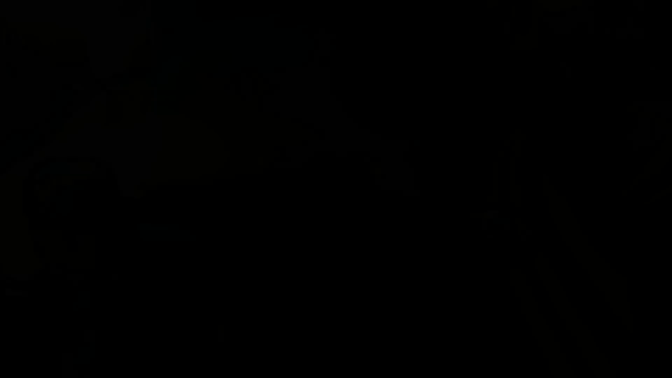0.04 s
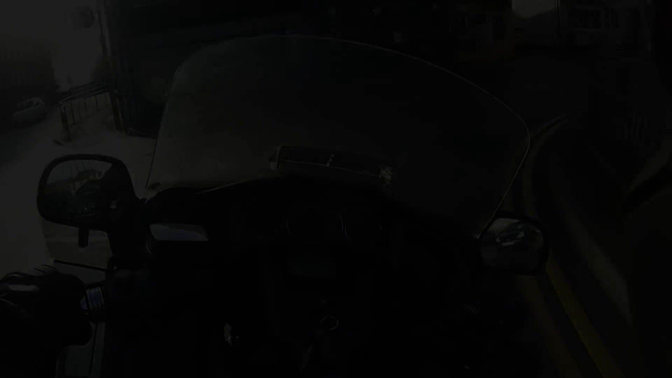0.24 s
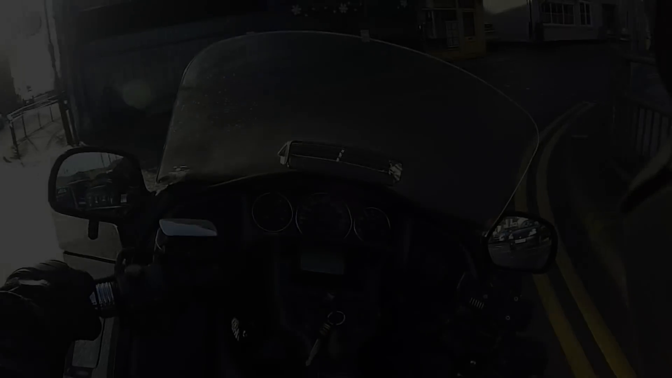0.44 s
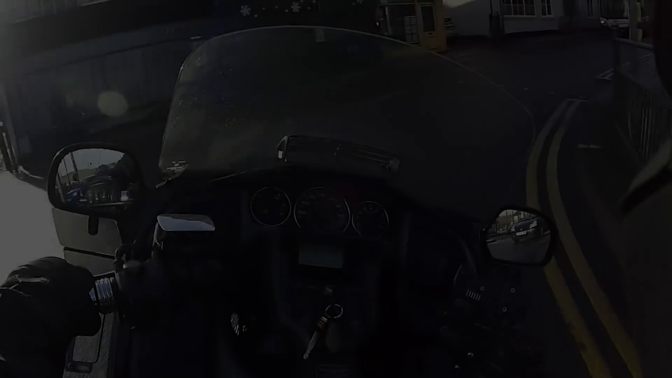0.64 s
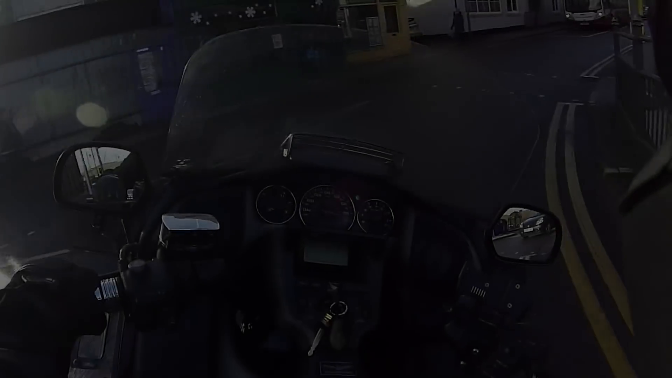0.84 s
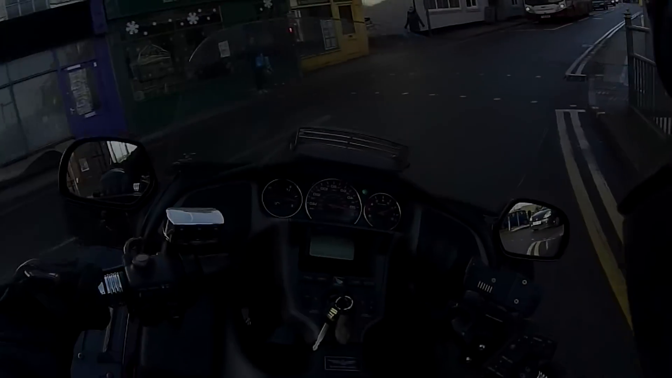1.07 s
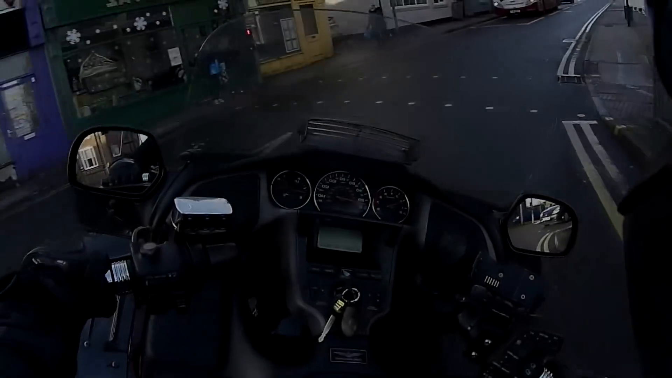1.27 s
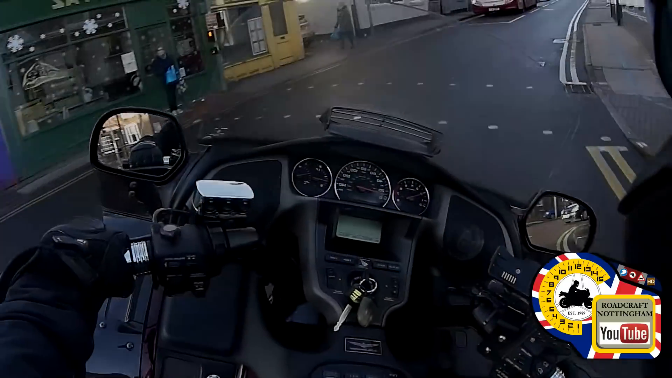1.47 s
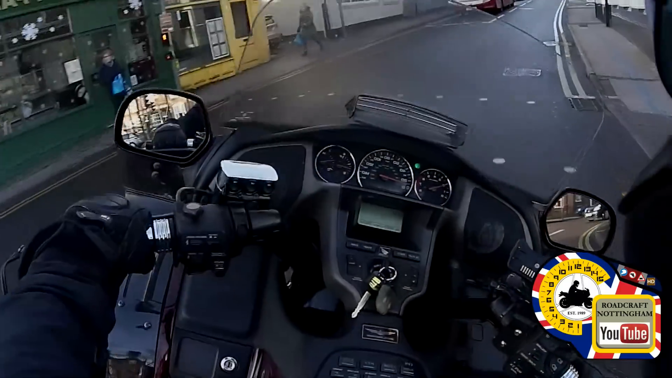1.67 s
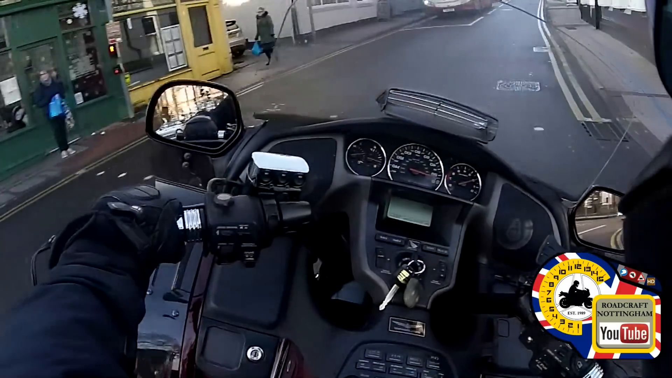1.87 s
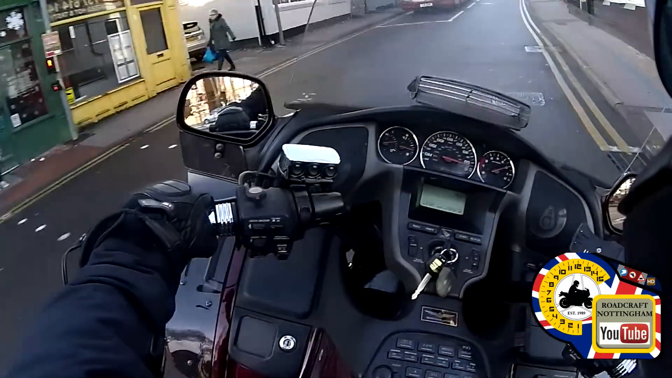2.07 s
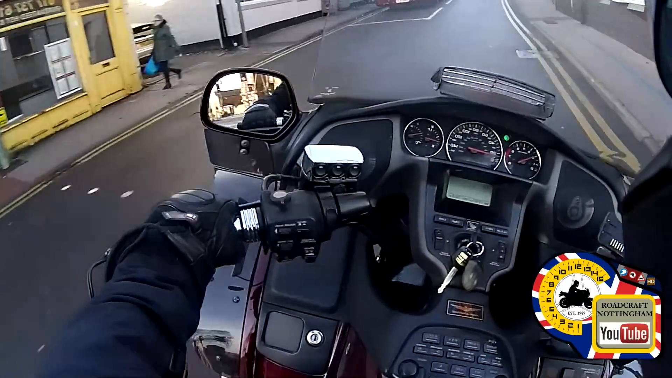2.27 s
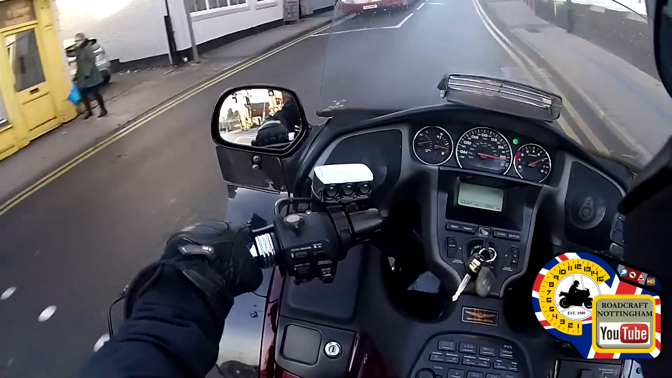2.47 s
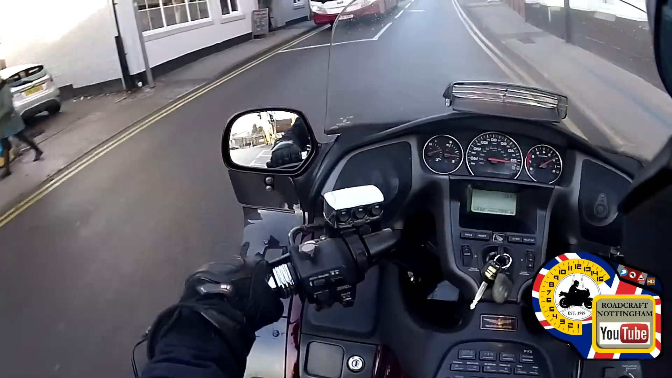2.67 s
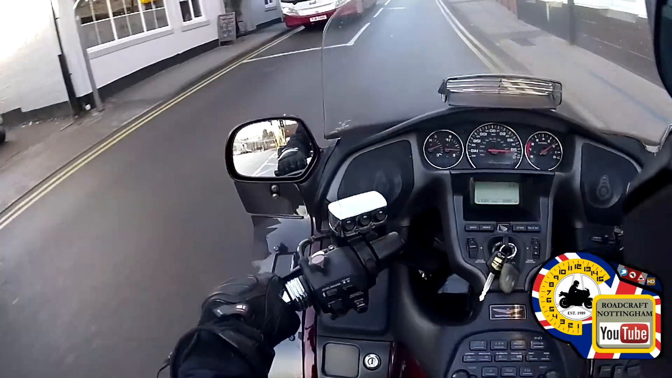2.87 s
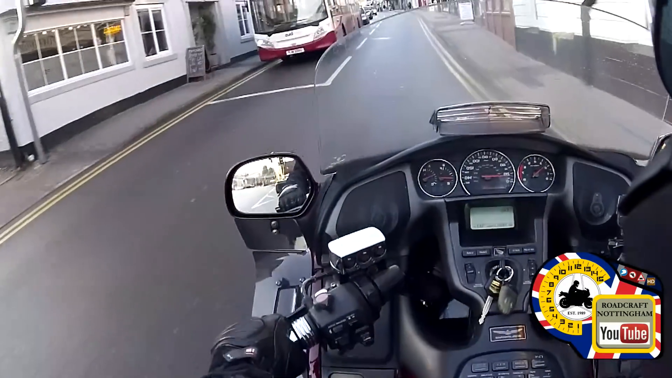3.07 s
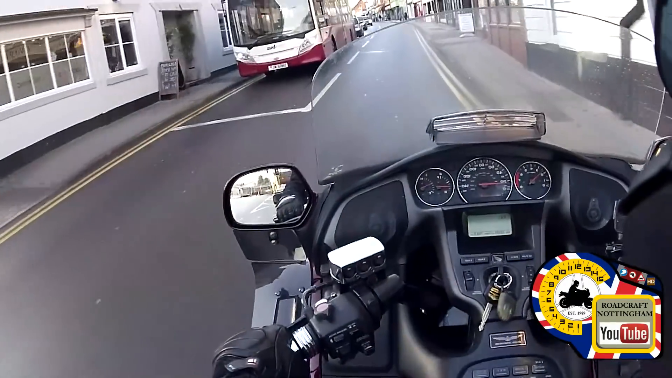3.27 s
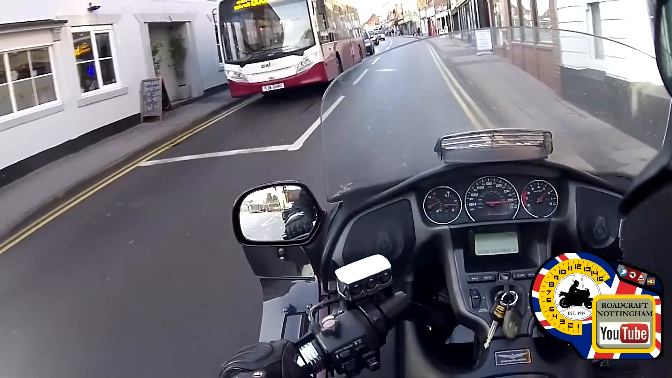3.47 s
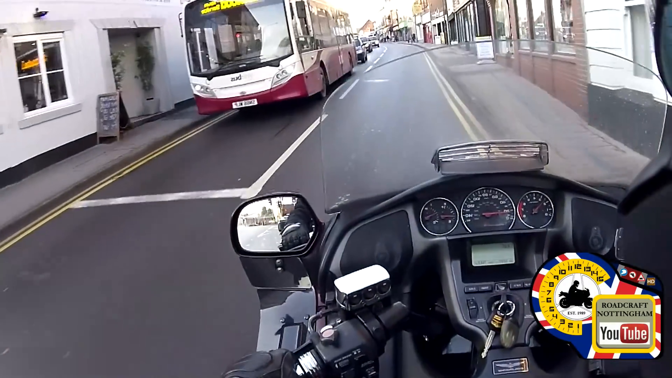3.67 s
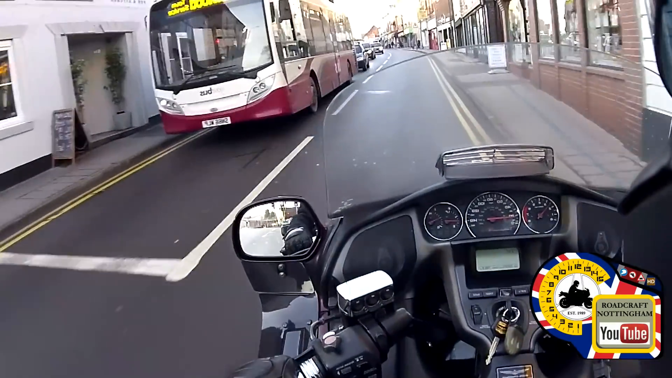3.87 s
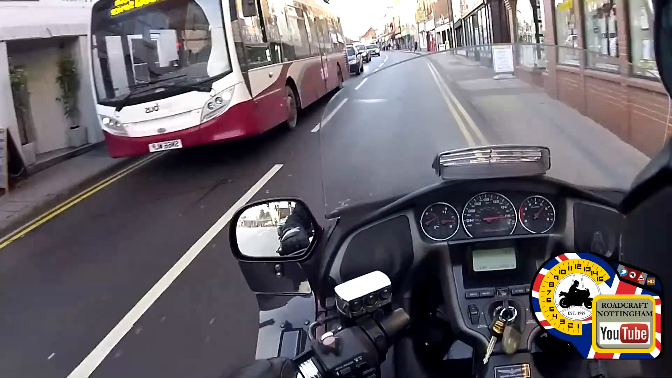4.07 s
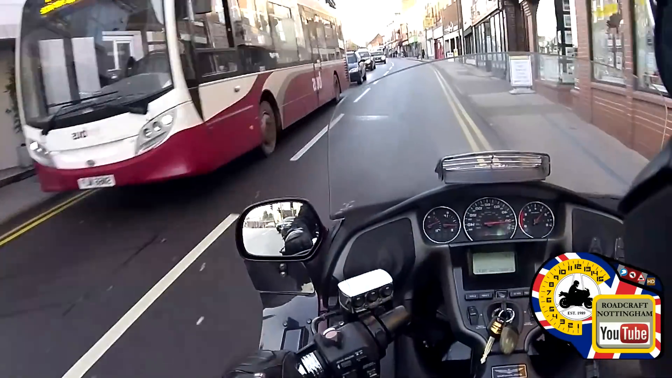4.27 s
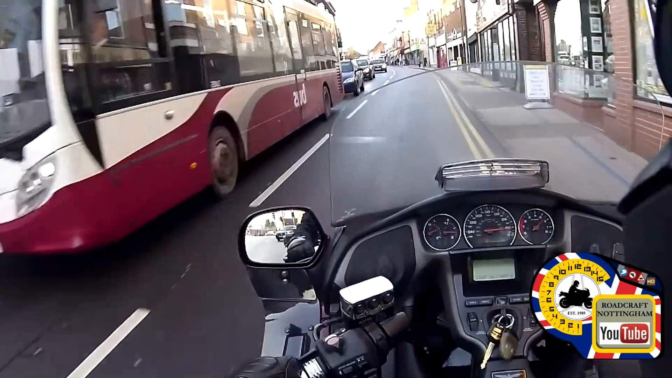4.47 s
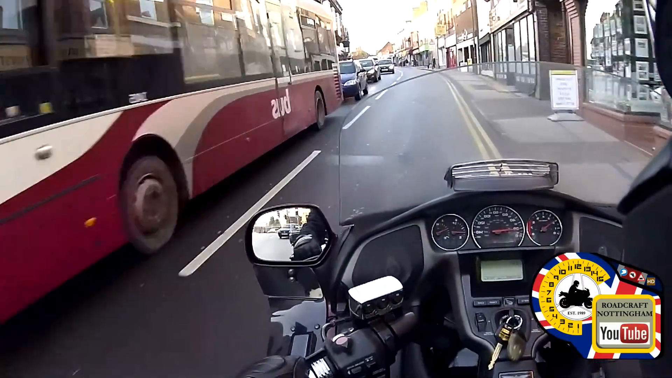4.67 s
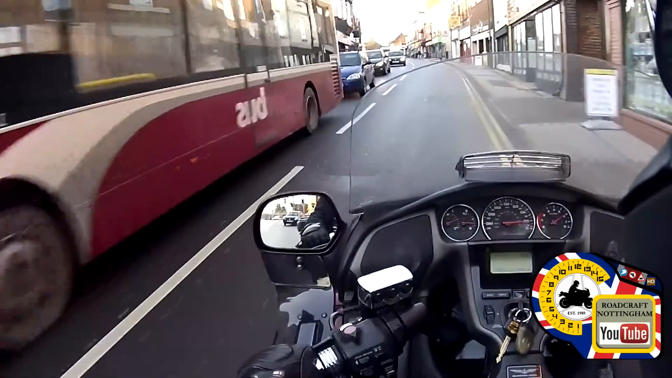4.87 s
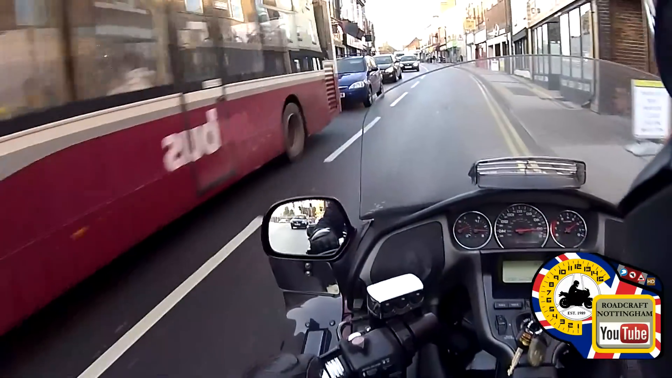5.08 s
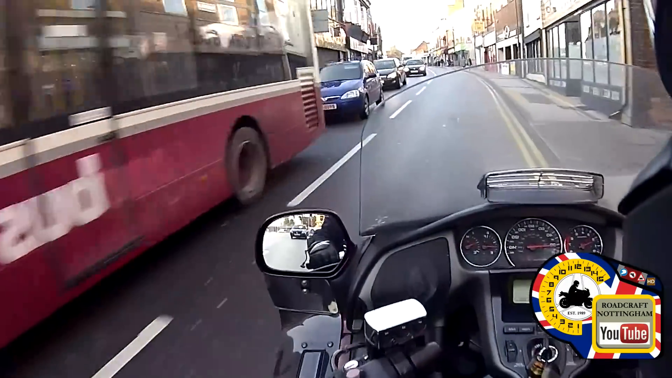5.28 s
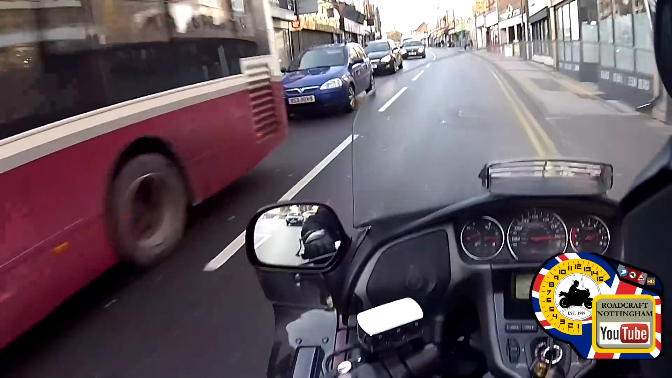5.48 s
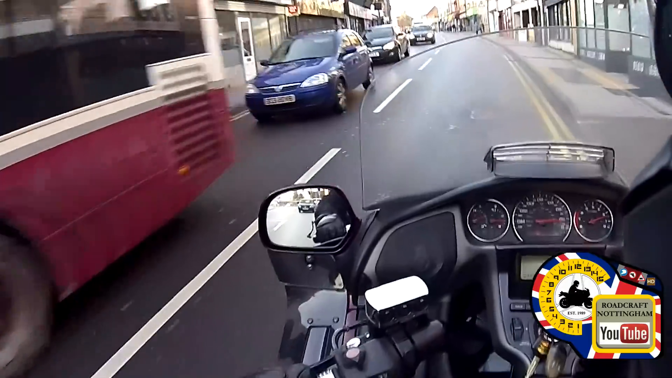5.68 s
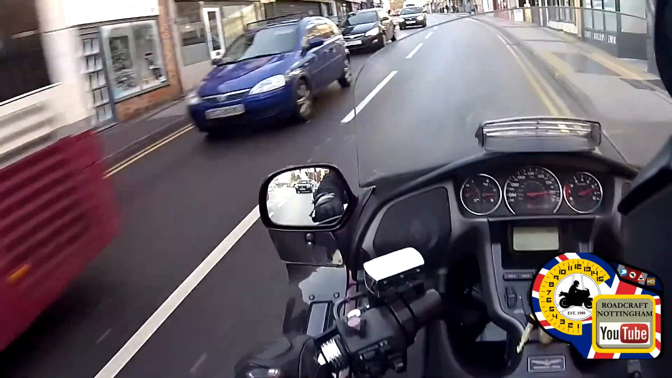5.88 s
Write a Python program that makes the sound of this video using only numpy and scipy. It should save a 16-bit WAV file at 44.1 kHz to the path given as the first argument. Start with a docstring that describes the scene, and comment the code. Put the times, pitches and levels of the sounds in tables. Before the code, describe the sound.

Heard from the seat, a big motorcycle engine climbs in pitch, shifts gear with a clunk and settles to a lower, steady note.

```python
"""A town street, from the seat of a large six-cylinder motorcycle pulling away in first gear.
The firing note climbs, the clutch goes in, a gear clunks home and the engine settles lower in second.
Gear teeth whine above the exhaust, gas pulses ring the fairing and the engine cases rustle.
Tyres and air hiss, wind buffets, loose parts tick; near the end a bus alongside reflects the hiss."""
import sys
import numpy as np
from scipy import signal
from scipy.io import wavfile

SR = 44100
rng = np.random.default_rng(int(sys.argv[2]) if len(sys.argv) > 2 else 0)


def transcribe(signal):
    """Save signal, clipped to [-1, 1], as a 16-bit WAV file at the path in sys.argv[1]."""
    frames = np.atleast_2d(signal).T
    limited = np.clip(frames, -1, 1)
    pcm = np.round(limited * 32767).astype(np.int16)
    wavfile.write(sys.argv[1], SR, pcm)


N = 261424

# Engine speed. Each row: time in seconds, firing rate in Hz.
FIRING_HZ = [(0.3, 89.54), (0.6, 90.17), (0.83, 90.4), (0.98, 91.93), (1.38, 96.1), (1.5, 95.9),
             (1.62, 98.68), (2.14, 105.3), (2.44, 110), (3.24, 121.7), (3.8, 130.6), (4.03, 133),
             (4.08, 129.5), (4.31, 100.1), (4.75, 100.7), (4.95, 79), (5.93, 79.53)]
# Each row: time in seconds, opening from 0 to 1.
THROTTLE_OPENING = [(0, 0.14), (2.3, 1.0), (4.0, 0.94), (4.25, 0.13), (4.78, 0.05), (5.05, 0.66),
                    (5.55, 0.93), (5.78, 0.14), (5.93, 0.49)]
# Firing note. Each row: time in seconds, level in dB.
FIRING_DB = [(0.4, -21.5), (1.5, -21), (2.2, -15), (2.44, -16), (2.67, -11.5), (2.96, -15.5), (3.1, -11.5),
             (3.24, -15), (3.38, -12), (3.49, -14.5), (3.57, -12), (3.68, -13.5), (3.8, -11), (4.03, -14.5),
             (4.08, -20), (4.16, -13.5), (4.37, -31), (4.75, -25.5), (4.95, -28.5), (5.06, -18.5),
             (5.4, -31.5), (5.76, -21), (5.93, -23.5)]
# Its octave at full throttle. Each row: pitch in Hz, level in dB.
OCTAVE_DB = [(158, -16), (180, -17), (195, -26.5), (214, -32.5), (240, -35), (266, -33)]
# Lines from unequal cylinders. Each row: multiple of crank speed, base level in dB.
UNEVEN_LINES = [(2, -45), (4, -30), (4.5, -32.5), (5, -37.5), (7, -43.5), (7.5, -42), (8.5, -44.5),
                (9, -45), (12, -47.5), (13.5, -47)]
# Panel resonances. Each row: centre in Hz, width in Hz, boost of those lines in dB.
FAIRING_MODES = [(476.4, 55, 14.5), (796, 41, 3)]
# Each row: time in seconds, shaft speed as a share of crank speed, first-gear gain in dB.
CLUTCH_GRIP = [(0.1, .855, 0), (.47, .935, 2), (.95, 1.0, 2), (2.8, 1.0, -1), (3.4, 1.0, -9),
               (4.1, 1.0, -30)]
# First-gear lines. Each entry: multiple of shaft speed.
FIRST_GEAR_ORDERS = [18.5, 20.1, 27.8, 30.1]
# Same lines. Each entry: base level in dB.
FIRST_GEAR_LINES_DB = [-45, -41.5, -50, -55.5]
# Play between teeth, which part as the engine drops. Each row: time in seconds, play in radians,
# whine gain in dB.
TOOTH_PLAY = [(.8, .48, 0), (2.3, .75, 0), (4.1, .95, 0), (4.2, 1.1, -5), (4.31, .65, 0), (4.84, .7, 0),
              (4.89, .85, -8), (5, .85, 0)]
# Tooth load, light between gears. Each row: time in seconds, gain of the octave whine in dB.
TOOTH_LOAD_DB = [(0.6, 2.5), (1.1, 0), (2.3, 4.5), (4.15, 1.5), (4.29, 9), (4.34, -21), (4.75, -29),
                 (4.77, 11), (4.95, 6), (5.7, 3.5), (5.9, 9.5)]
# Whine through the gear casing. Each row: pitch in Hz, base level in dB.
CASING_DB = [(1960, -59.5), (2210, -54), (2450, -53.5), (2800, -55.5), (3000, -63), (3240, -57),
             (3950, -71.5), (4420, -70.5), (5260, -75.5), (6500, -80)]
# Pump gear whine. Each row: pitch in Hz, base level in dB.
PUMP_DB = [(1470, -60), (1700, -63), (1860, -54), (2000, -58.5), (2170, -55.5)]
# Stereo image of the noises. Each row: frequency in Hz, left-right likeness, left lead in dB.
STEREO_IMAGE = [(25, .99, .6), (500, .997, .6), (1500, .982, .25), (2800, .975, .3), (4500, .87, .45),
                (8000, .8, .5), (12000, .3, .8)]
# Noise spectra. Each row: frequency in Hz, relative density in dB.
ROAR_SPECTRUM = [(70, -19), (110, -9.5), (200, -9.5), (350, -16), (500, -12), (700, -17.5), (1000, -30),
                 (1800, -51), (3000, -60)]
CLATTER_SPECTRUM = [(1200, 3), (2000, -3), (3000, -4.5), (4500, -14.5), (7000, -25)]
HISS_SPECTRUM = [(5500, -7), (7000, -2), (9300, 5.5), (10800, -7), (13000, -18.5)]
WIND_SPECTRUM = [(18, -1.5), (35, -9), (70, -7.5)]
BUS_SPECTRUM = [(5000, 1), (9000, -5)]
# Tyre and air hiss, raised by road speed. Each row: time in seconds, level in dB.
ROAD_HISS_DB = [(0.1, -75), (2.4, -72.5), (2.65, -67), (4.68, -68), (4.85, -71.5), (5.93, -68)]
# Louder ticks of loose parts. Each row: start in seconds, strength in dB.
LOUD_TICKS = [(2.3008, -45), (2.55, -40.5), (2.5653, -47), (2.7099, -46), (2.739, -40), (2.8413, -40),
              (3.0964, -40.5), (3.345, -45.5), (3.5861, -42), (3.776, -43), (3.798, -38), (4.1656, -38.5),
              (5.078, -45), (5.2046, -45)]
# Each row: start in seconds, ring, thump and rasp strengths in dB, rattle length in seconds.
FRAME_KNOCKS = [(1.945, -42, -25.5, -69, 0.059), (4.079, -38, -17, -73, 0.033),
                (4.291, -44, -11.5, -72, 0.05), (4.425, -34, -42, -47, 0.026),
                (4.761, -44.5, -55, -44, 0.04), (5.703, -57, -15, -80, 0.026)]
# Each row: frequency in Hz, gain in dB, 60 dB decay time in seconds.
FRAME_MODES = [(490, 0, .035), (575, -2, .03), (770, -11, .03), (1330, -20, .02)]
# Final-drive whine, one list per gear. Each row: time in seconds, pitch in Hz, level in dB.
DRIVE_WHINE = [
    [(3.4, 764, -46), (3.63, 776.5, -32.5), (3.72, 794.5, -28), (4.038, 819, -28.5), (4.124, 787.7, -34.5),
     (4.16, 787.1, -61)],
    [(4.7, 791.5, -58), (4.712, 798, -38), (4.924, 798.5, -27), (4.966, 796.6, -40.5),
     (5.044, 794.5, -31.5), (5.96, 801.6, -31.5)],
]
# Hiss reflected by the bus. Each row: time in seconds, level in dB.
BUS_DB = [(4.25, -83), (4.45, -67), (4.8, -63), (5.25, -69)]


def amp(db):
    """dB to gain."""
    return 10 ** (np.asarray(db) / 20)


def rms_one(x):
    """Scale to rms 1."""
    return x / np.sqrt(np.mean(x ** 2) + 1e-20)


def in_time(rows):
    """Table columns as per-sample curves."""
    times_s, *columns = np.transpose(rows)
    return [np.interp(np.arange(N) / SR, times_s, column) for column in columns]


def at_hz(rows, hz):
    """Read a spectrum on a log-frequency axis."""
    rows = np.array(rows)
    return np.interp(np.log(hz), np.log(rows[:, 0]), rows[:, 1])


def butter(x, order, edges_hz, kind="band"):
    """Butterworth filter."""
    return signal.sosfilt(signal.butter(order, edges_hz, kind, fs=SR, output="sos"), x)


def band_rms_one(noise, low_hz, high_hz):
    """Scale so that one band has rms 1."""
    return noise / np.std(butter(noise, 4, [low_hz, high_hz]))


def drift(rate_hz):
    """Random wander of rms 1: low-passed noise, drawn every 40th sample."""
    pole = np.exp(-80 * np.pi * rate_hz / SR)
    slow = signal.lfilter([1], [1, -2 * pole, pole * pole], rng.standard_normal(N // 40 + 2002))[2000:]
    return np.interp(np.arange(N) / 40, np.arange(len(slow)), rms_one(slow))


def tone(phase_rad, rms_db):
    """Sine with a random starting phase."""
    return np.sqrt(2) * amp(rms_db) * np.sin(phase_rad + rng.uniform(0, 2 * np.pi))


def ring(clicks, hz, t60_s):
    """Damped mode: a unit click starts a sine of height 1."""
    r, w = amp(-60 / (t60_s * SR)), 2 * np.pi * hz / SR
    return signal.lfilter([0, np.sin(w)], [1, -2 * r * np.cos(w), r * r], clicks + 1e-18)


def pan(left_db):
    """Gains that raise the left and lower the right."""
    return amp([[left_db], [-left_db]])


def band_noise(spectrum, edges_hz, shared_drift, shared_db, own_db, pulsing=1):
    """Stereo noise bands whose gains wander partly together, partly alone."""
    white = rng.standard_normal((2, 2, N)) * pulsing
    image, out = np.array(STEREO_IMAGE), 0
    for k, (low_hz, high_hz) in enumerate(zip(edges_hz, edges_hz[1:])):
        mid, side = butter(white[k % 2], 2, [low_hz, high_hz])  # adjacent bands uncorrelated
        hz = np.sqrt(low_hz * high_hz)
        alike, left_db = np.clip(at_hz(image[:, :2], hz), 0, 1), at_hz(image[:, ::2], hz)
        gain = amp(at_hz(spectrum, hz) + shared_db * shared_drift + own_db * drift(4.4))
        stereo = np.sqrt(1 + alike) * mid + np.sqrt(1 - alike) * side * [[1], [-1]]
        out += gain * pan(left_db) * stereo
    return out


def exhaust(crank_rad, crank_hz, shut):
    """Three firings a turn give a note and its octave, in step; unequal cylinders add lines."""
    firing_db = in_time(FIRING_DB)[0] + 0.5 * drift(28)
    octave_db = at_hz(OCTAVE_DB, 6 * crank_hz) - 10 * shut + 0.17 * drift(32)
    out = np.sqrt(2) * (amp(firing_db) * np.sin(3 * crank_rad) + amp(octave_db) * np.sin(6 * crank_rad))
    for order, base_db in UNEVEN_LINES:
        panel_db = sum(boost_db / (1 + (2 * (order * crank_hz - hz) / width_hz) ** 2)
                       for hz, width_hz, boost_db in FAIRING_MODES)
        phase_rad = order * crank_rad + 0.3 * drift(7.7)
        out += tone(phase_rad, base_db - 5.5 * shut + panel_db + 1.5 * drift(5.6))
    return out


def first_gear(crank_hz):
    """Shafts behind the clutch whine, lagging the crank while it slips."""
    grip, gain_db = in_time(CLUTCH_GRIP)
    shaft_rad = 2 * np.pi * np.cumsum(grip * crank_hz) / SR
    return sum(tone(order * shaft_rad + .65 * drift(21), base_db + gain_db + 2.8 * drift(5))
               for order, base_db in zip(FIRST_GEAR_ORDERS, FIRST_GEAR_LINES_DB))


def gear_whine(crank_rad, crank_hz, primary_teeth=74, pump_teeth=49):
    """Primary and pump meshes; a throb at each turn and each firing splits the primary line."""
    slipping, gripped = (.85, 1.1, .2), (1.25, .65, .8)  # time in seconds, throb depth, steady share
    depth, steady = in_time([slipping, gripped])
    play_rad, parted_db = in_time(TOOTH_PLAY)
    load_db, = in_time(TOOTH_LOAD_DB)
    turn = np.cos(crank_rad + 1.2 * drift(3))
    firing = np.cos(3 * crank_rad + play_rad * drift(10))
    backlash_rad = play_rad * drift(28)
    mesh_rad, mesh_hz = primary_teeth * crank_rad + backlash_rad, primary_teeth * crank_hz

    throb = steady + depth * (0.9 * turn + firing) + 0.9 * play_rad * drift(160)
    primary = throb * tone(mesh_rad, at_hz(CASING_DB, mesh_hz) + parted_db + 1.5 * play_rad * drift(20))

    octave_rad = 2 * mesh_rad + 1.2 * play_rad * drift(60)
    octave_db = at_hz(CASING_DB, 2 * mesh_hz) + load_db + 3 * play_rad * drift(16)
    octave = (1 + .6 * turn * play_rad + .5 * firing) * tone(octave_rad, octave_db)

    pump_db = at_hz(PUMP_DB, pump_teeth * crank_hz) + .4 * np.minimum(load_db, 0) + parted_db
    pump = (.8 + 0.35 * turn) * tone(pump_teeth * crank_rad + backlash_rad, pump_db + 2.5 * drift(12))
    return primary + octave + pump


def gas_roar(crank_rad, shut, bumps):
    """Gas noise puffs out at each firing and rings the fairing."""
    puffs = 1 + 0.48 * np.cos(3 * crank_rad)
    edges_hz = 60 * 2 ** np.arange(0, 6.1, .5)
    noise = band_noise(ROAR_SPECTRUM, edges_hz, bumps, shared_db=0.58, own_db=1, pulsing=puffs)
    for hz, width_hz, _ in FAIRING_MODES:
        b, a = signal.iirpeak(hz, hz / width_hz, fs=SR)
        noise = noise + .5 * signal.lfilter(b, a, noise)
    return amp(-32 - 2.5 * shut) * band_rms_one(noise, 250, 1200)


def case_clatter(hiss_db, bumps):
    """Dense rustle of the engine cases; its level follows the road hiss."""
    level_db = -63 + 0.86 * (hiss_db - hiss_db.mean())
    edges_hz = 1100 * 2 ** np.arange(0, 3.1, .5)
    noise = band_noise(CLATTER_SPECTRUM, edges_hz, bumps, shared_db=0.69, own_db=0.99)
    return amp(level_db) * band_rms_one(noise, 3170, 4500)


def road_hiss(hiss_db, bumps):
    """Bright tyre and air noise over steady microphone self-noise."""
    edges_hz = 5000 * 2 ** np.arange(0, 1.7, 1 / 3)
    noise = band_noise(HISS_SPECTRUM, edges_hz, bumps, shared_db=1, own_db=1.3)
    self_noise = butter(rng.standard_normal((2, N)), 2, [5000, 14000])
    return amp(hiss_db) * band_rms_one(noise, 8300, 11000) + amp(-77.5) * rms_one(self_noise)


def wind_buffet():
    """Lumpy low wind on the microphone."""
    edges_hz = 14 * 2 ** np.arange(0, 3, .5)
    return amp(-38.5) * rms_one(band_noise(WIND_SPECTRUM, edges_hz, drift(2.7), shared_db=1, own_db=2))


def loose_parts(hiss_db, small_per_s=23, decay_s=.0007):
    """Dry bright snaps: a few loud, many small ones that follow the road hiss in level."""
    clicks = (rng.random(N) < small_per_s / SR) * amp(hiss_db + 12.5 + 3.3 * rng.standard_normal(N))
    for start_s, strength_db in LOUD_TICKS:
        clicks[round(start_s * SR)] = amp(strength_db)
    envelope = signal.lfilter([1], [1, -np.exp(-1 / (decay_s * SR))], clicks + 1e-18)
    snaps = envelope * (rng.standard_normal(N) + rng.standard_normal((2, N)))
    return butter(snaps, 1, [2000, 9500])


def frame_knocks(contacts_per_s=6000):
    """Short rattles of contacts ring the frame, each with a low thump and a bright rasp."""
    time_s = np.arange(N) / SR
    rattle, push, rasp_envelope = np.zeros((3, N))
    contacts = rng.standard_normal(N) * (rng.random(N) < contacts_per_s / SR)
    for start_s, ring_db, thump_db, rasp_db, length_s in FRAME_KNOCKS:
        window = np.sin(np.pi * np.clip((time_s - start_s) / length_s, 0, 1))
        rattle += amp(ring_db) * contacts * window
        rasp_envelope += amp(rasp_db) * window
        push[round(start_s * SR)] = amp(thump_db)
    force = butter(rattle + push / 100 + 1e-18, 2, 1800, "low")
    frame = sum(amp(db) * ring(force, hz, t60_s) for hz, db, t60_s in FRAME_MODES)
    thump = butter(ring(push, hz=120, t60_s=0.15), 2, 500, "low")
    rasp = butter(rasp_envelope * rng.standard_normal(N), 2, [1200, 5500])
    return frame + thump + rasp


def final_drive():
    """Whine under load, late in first gear and again in second; silent through the shift."""
    out = np.zeros(N)
    for rows in DRIVE_WHINE:
        hz, level_db = in_time(rows)
        start_s, end_s = rows[0][0], rows[-1][0]
        loaded, = in_time([(start_s - .03, 0), (start_s, 1), (end_s, 1), (end_s + 0.017, 0)])
        phase_rad = 2 * np.pi * np.cumsum(hz) / SR + 0.4 * drift(20)
        out += loaded * tone(phase_rad, level_db + 1.5 * drift(20))
    return out


def bus_reflection(bumps):
    """Upper road hiss off the flat side of a bus, as a separate swell of noise."""
    edges_hz = 4200 * 2 ** np.arange(0, 1.4, 1 / 3)
    noise = band_noise(BUS_SPECTRUM, edges_hz, bumps, shared_db=0.93, own_db=0.94)
    return amp(in_time(BUS_DB)[0]) * rms_one(noise)


def scene():
    """Stereo mix of engine, transmission, road and wind."""
    crank_hz = in_time(FIRING_HZ)[0] / 3  # three firings a turn
    crank_rad = 2 * np.pi * np.cumsum(crank_hz) / SR
    shut = 1 - np.clip(in_time(THROTTLE_OPENING)[0], 0, 1)
    hiss_db, = in_time(ROAD_HISS_DB)
    bumps = rms_one(drift(6.1) + 3.6 * drift(12))  # the road shakes the noise levels together
    body = exhaust(crank_rad, crank_hz, shut) + first_gear(crank_hz) + final_drive() + frame_knocks()
    engine = body * pan(left_db=0.68) + gear_whine(crank_rad, crank_hz) * pan(left_db=-0.2)
    engine += gas_roar(crank_rad, shut, bumps) + case_clatter(hiss_db, bumps)
    return engine + road_hiss(hiss_db, bumps) + wind_buffet() + loose_parts(hiss_db) + bus_reflection(bumps)


def record(dry):
    """Brief opening silence, then a steep treble cut."""
    start_s, fade_s, stopband_hz = .037, .0012, 15100
    gate, = in_time([(start_s, 0), (start_s + fade_s, 1)])
    return signal.sosfilt(signal.cheby2(12, 70, stopband_hz, fs=SR, output="sos"), dry * gate)


dry = scene()
out = record(dry)
transcribe(out)
```